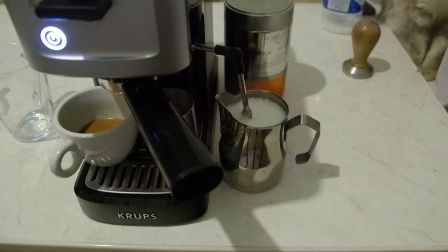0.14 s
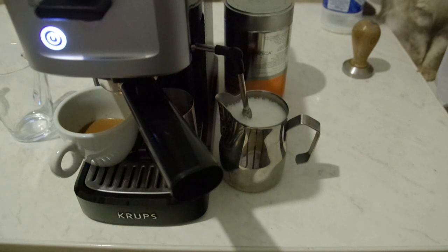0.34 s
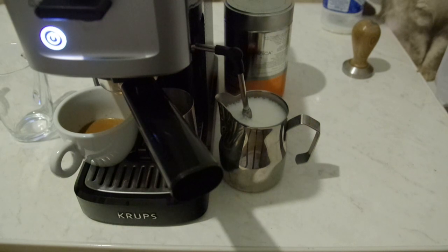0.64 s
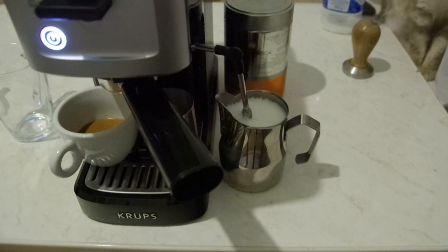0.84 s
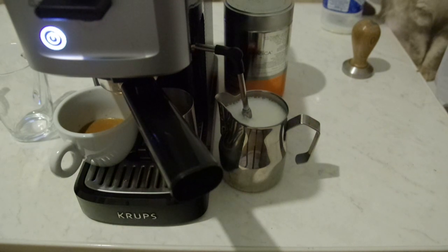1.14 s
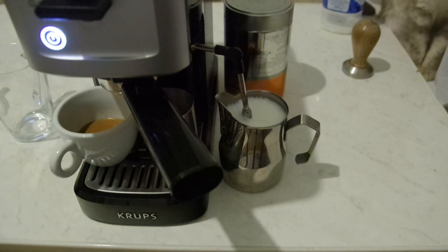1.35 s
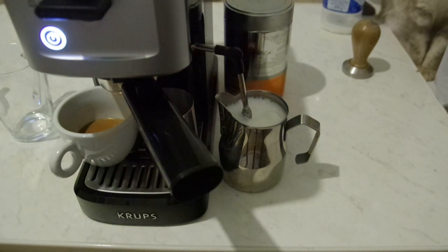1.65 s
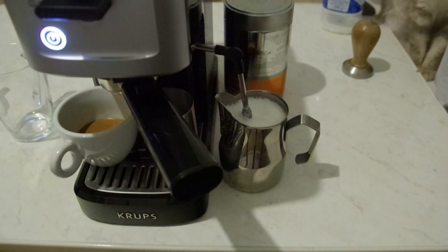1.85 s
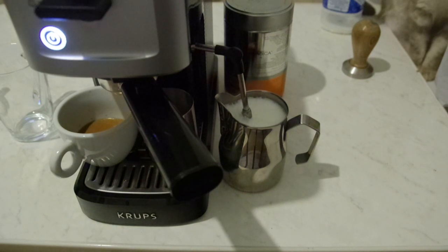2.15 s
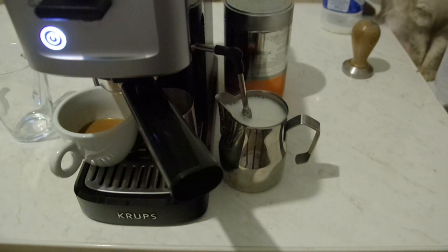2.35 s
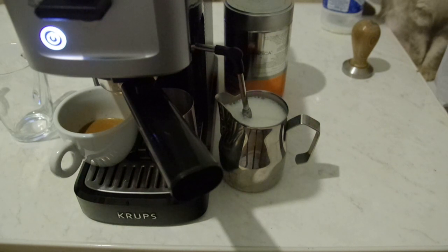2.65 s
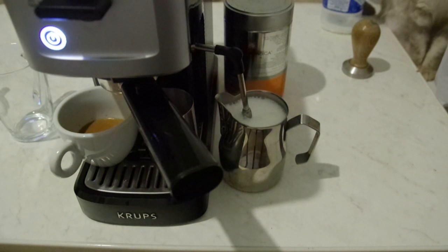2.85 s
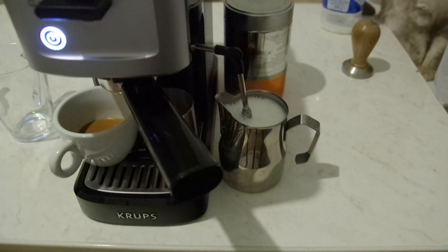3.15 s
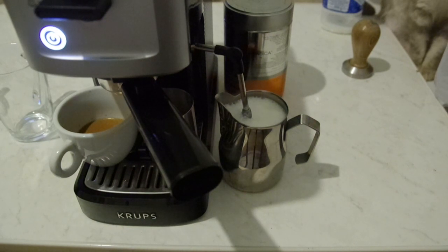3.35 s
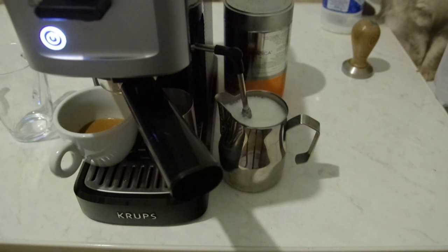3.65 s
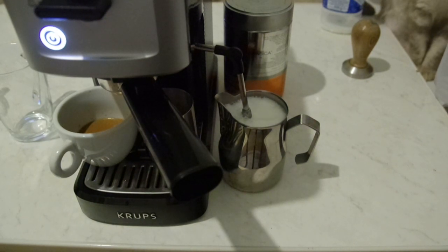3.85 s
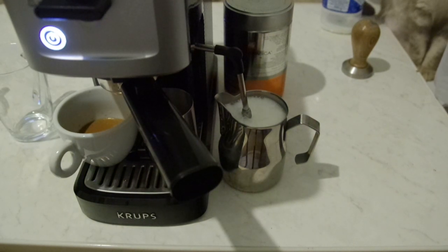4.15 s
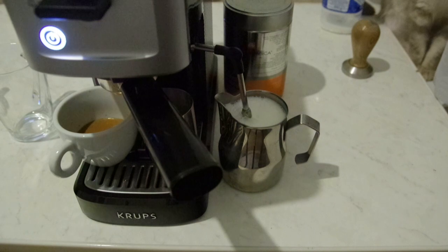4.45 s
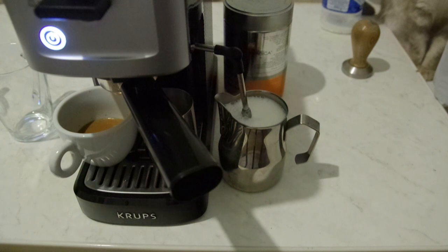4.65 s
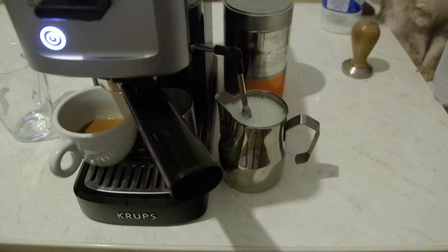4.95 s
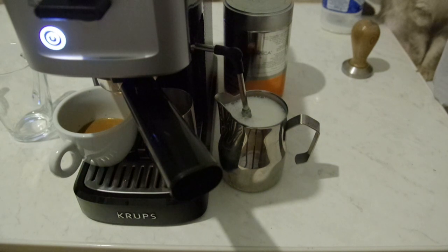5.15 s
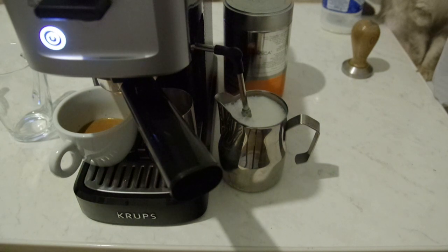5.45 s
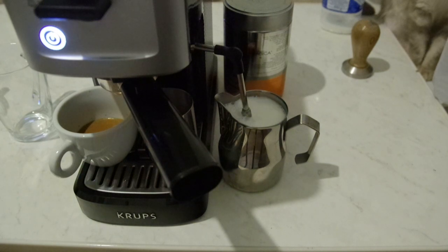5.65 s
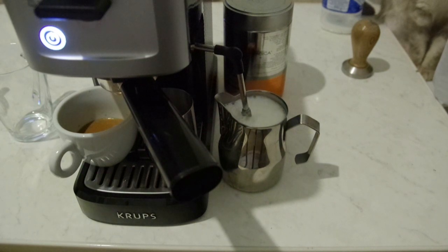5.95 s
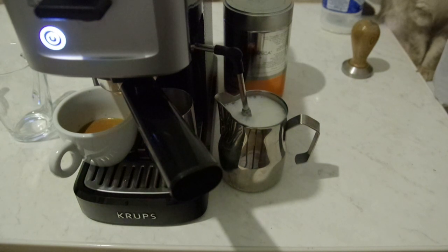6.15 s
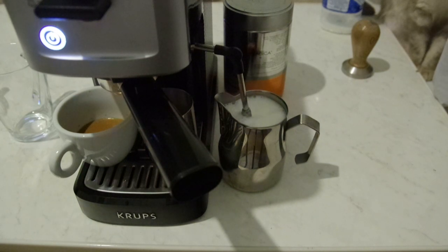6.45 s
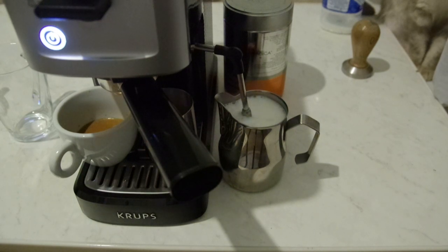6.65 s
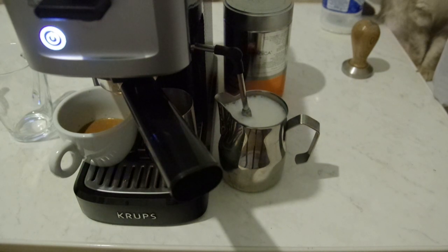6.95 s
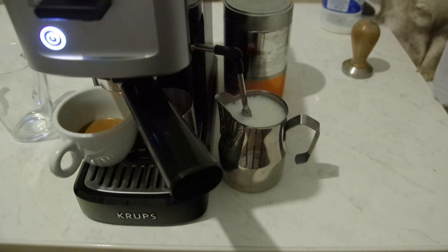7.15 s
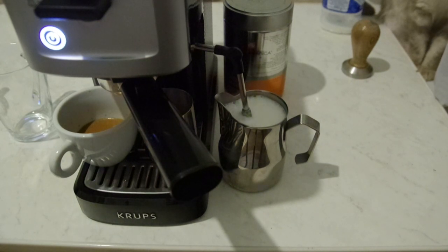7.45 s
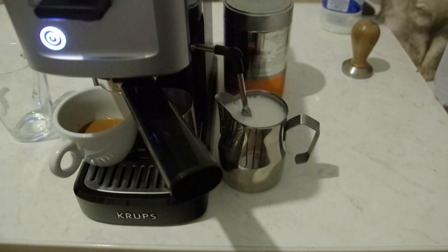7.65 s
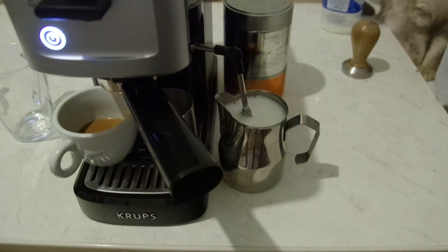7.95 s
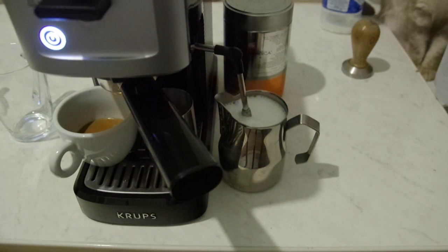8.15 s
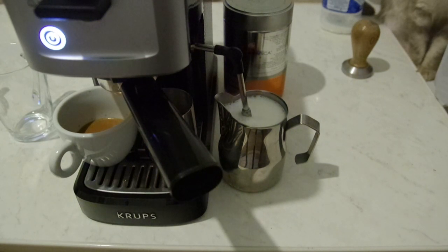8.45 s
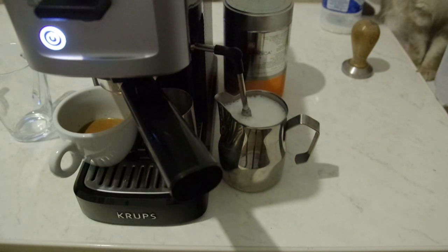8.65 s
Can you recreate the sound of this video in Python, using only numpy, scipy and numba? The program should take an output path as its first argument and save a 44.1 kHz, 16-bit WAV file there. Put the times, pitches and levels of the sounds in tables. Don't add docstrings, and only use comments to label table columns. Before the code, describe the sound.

Close milk steaming in a small kitchen: a ragged, ringing hiss slowly fades as a coffee machine's pump thuds about three times a second, skipping every fifth beat.

```python
import sys
import numpy as np
from scipy import signal
from scipy.fft import rfft, irfft, next_fast_len
from scipy.io import wavfile
from scipy.ndimage import uniform_filter1d
from numba import njit

SR = 44100
rng = np.random.default_rng(int(sys.argv[2]) if len(sys.argv) > 2 else 0)


def natural_amplitude(level_db):
    exponent = np.asarray(level_db, float) / 20
    return 10 ** exponent


def digitize_waveform(pressure):
    field = np.atleast_2d(pressure).T
    bounded = np.clip(field, -1, 1)
    quanta = np.round(bounded * 32767).astype(np.int16)
    wavfile.write(sys.argv[1], SR, quanta)


N = 387638
SIZE = next_fast_len(N)

FIRST_STROKE_S, MAINS_HZ = -0.6372, 49.997
ROUND_CYCLES, STROKE_CYCLES = 78, [0, 16, 31, 47]


def level(x, db):
    return x * natural_amplitude(db) / np.sqrt(np.mean(x ** 2))


def read(table, hz):
    points = np.array(table, float)
    return np.interp(np.log(hz), np.log(points[:, 0]), points[:, 1])


@njit
def svf(x, hz, width):
    y, b, l = np.empty(len(x)), 0., 0.
    g, k = np.tan(np.pi * hz / SR), width / hz
    for i in range(len(x)):
        v = (b + g * (x[i] - l)) / (1 + g * (g + k))
        b, l, y[i] = 2 * v - b, l + 2 * g * v, k * v
    return y


def third_octave(x, hz):
    return level(svf(svf(x, hz, hz / 3), hz, hz / 3), 0)


def walk(rate):
    k = int(SR / rate)
    held = np.repeat(rng.standard_normal(N // k + 1), k)
    return 1.27 * uniform_filter1d(uniform_filter1d(held, k), k)[:N]


def ears(direct, hz):
    # frequency in Hz, left-right likeness from 0 to 1.
    likeness = [(60, 0.6), (300, 0.78), (1400, 0.73), (3000, 0.93), (6000, 0.54), (9000, 1), (15000, 0.6)]
    # frequency in Hz, left minus right in dB.
    balance = [(60, 0.5), (200, 1.5), (700, 1.5), (1290, 0.5), (2380, -0.5), (4400, -0.9), (8120, -4.5),
               (11500, 3), (15000, -1.5)]
    like = np.clip(read(likeness, hz), 0, .99)
    side = third_octave(rng.standard_normal(N), hz)
    both = np.sqrt(1 + like) * direct + np.sqrt(1 - like) * np.array([side, -side])
    return both * natural_amplitude(read(balance, hz) / 2 * np.array([[1], [-1]])) / np.sqrt(2)


def collapses(per_s, spread_db):
    when, size = rng.random(N), rng.exponential(size=N)
    blows = (when < per_s / SR) * natural_amplitude(spread_db * np.minimum(size, 6)) * rng.standard_normal(N)
    return level(blows, 0)


def swells(t, rows):
    return sum(db * np.exp(-.5 * ((t - s) / half) ** 2) for s, db, half in rows)


def layers_db(t):
    # time in seconds, level in dB, lean to small bubbles in dB.
    boiling = [(0.0, -31, -2), (0.46, -33.5, 6), (1.03, -29, 2), (2.3, -31.5, 4.5), (2.79, -31.5, 2.5),
               (2.91, -32, 3.5), (4.09, -32.5, 2.5), (4.13, -33.5, 0), (4.6, -34, 6), (5.02, -32, 3.5),
               (5.85, -32, 3), (5.92, -32, -3), (6.02, -31.5, 3), (6.14, -35.5, 1.5), (6.31, -34, 7.5),
               (6.41, -36.5, 5), (7.91, -38.5, 6.5), (8.79, -35.5, -1.5)]
    # time in seconds, level in dB.
    tearing = [(0.0, -28.5), (0.34, -29), (0.46, -33), (0.68, -32), (0.88, -27.5), (1.15, -31), (2.01, -35),
               (3.7, -32.5), (3.94, -36), (4.48, -39), (5.21, -38), (5.8, -41.5), (6.14, -38), (6.56, -42),
               (7.22, -41.5), (7.61, -39.5), (8.2, -47), (8.79, -45.5)]
    # time in seconds, swell in dB, half length in seconds, bubble size from 0 big to 1 small.
    gulps = [(0.496, -6, 0.018, 1), (0.588, 4.5, 0.0073, 0), (0.97, 4, 0.032, 0),
             (1.707, -5.5, 0.035, 0.93), (2.074, -11, 0.015, 0.37), (2.22, 3.2, 0.014, 0),
             (2.336, -7.5, 0.031, 0.93), (2.713, 4.3, 0.035, 0.11), (2.902, -2.0, 0.06, 0),
             (2.945, -3.5, 0.027, 0.76), (3.129, -7, 0.032, 1), (3.265, 0, 0.033, 0.22),
             (3.535, -5, 0.073, 0.19), (4.08, 1, 0.018, 0), (4.23, -6, 0.014, 0.1), (4.572, -6, 0.01, 0.51),
             (5.135, 3.0, 0.027, 1), (5.923, -7, 0.024, 0), (6.018, 3.5, 0.018, 1), (6.03, 2, 0.054, 0),
             (6.132, -1.5, 0.036, 1), (6.227, -3.4, 0.018, 0), (6.308, 2.5, 0.027, 1),
             (6.562, -3.2, 0.016, 1), (7.17, 7.5, 0.025, 1), (7.943, -3, 0.04, 1), (8.432, 2.5, 0.029, 1),
             (8.549, 0.5, 0.022, 0), (8.687, -3, 0.071, 0), (8.694, -7, 0.013, 1)]
    # time in seconds, swell in dB, half length in seconds, dB of spray for each dB of swell.
    gusts = [(0.0, 1.5, 0.015, 6), (0.236, 4, 0.033, 2.5), (0.467, 8, 0.032, 1.4), (0.68, 6.5, 0.029, 0.5),
             (0.957, 1.5, 0.06, -0.5), (1.12, 1, 0.04, 5.5), (1.586, 1.5, 0.012, 8.5),
             (1.69, 4, 0.031, 2.5), (2.132, 5.5, 0.018, 1), (2.244, 4, 0.079, 1.6),
             (2.574, 3.9, 0.028, 0.5), (2.826, 0.5, 0.035, 6), (3.247, 7.5, 0.02, -1),
             (3.626, 5.1, 0.06, 0.6), (4.05, 3, 0.012, 1), (4.217, 8, 0.044, 1.16), (4.83, 4.4, 0.036, 0.3),
             (5.046, 0.4, 0.06, 6), (5.517, 1, 0.067, 6), (5.936, 2.5, 0.06, 0.5), (6.266, 5, 0.06, 0.5),
             (6.61, 8.9, 0.014, 1.2), (6.976, 2, 0.027, 2.5), (7.183, 4, 0.017, 2.1), (7.44, 7, 0.06, 0.2),
             (7.79, 5.5, 0.067, 0.6), (8.13, 3, 0.075, 2), (8.476, 3, 0.04, 2.2), (8.735, 3, 0.011, 0)]

    s, boil_db, lean_db = np.transpose(boiling)
    boil = np.interp(t, s, boil_db) - 3.5
    lean = np.interp(t, s, lean_db)
    big = boil - lean / 2 + swells(t, [(s, db * (1 - size), half) for s, db, half, size in gulps])
    small = boil + lean / 2 + swells(t, [(s, db * size, half) for s, db, half, size in gulps])

    jet = np.interp(t, *np.transpose(tearing))
    gust = swells(t, [(s, db, half) for s, db, half, bright in gusts])
    mist = swells(t, [(s, db * bright, half) for s, db, half, bright in gusts])
    spray_rise = 1.28 * (jet + 35) + mist
    spray = -45 + spray_rise
    finest = -52.5 + spray_rise + 0.9 * mist
    return np.array([big, small, jet - 1.5 + gust, spray, finest])


def steam():
    tops_hz = [2400, 4300, 8200, 12500, 15500]
    # frequency in Hz, density in dB per Hz.
    hiss = [(700, -43), (1200, -17.5), (1600, -7.5), (1930, -4.5), (2080, 2.5), (2600, 1), (2900, -1),
            (3500, 0.5), (4350, 1.5), (4600, -3), (6000, -3.5), (7600, -2), (9000, -5), (12000, -19.5),
            (13500, -23), (16000, -27)]
    s = np.arange(0, N / SR + .01, .004)
    layers = layers_db(s)
    place = np.arange(len(layers))
    tops_db = read(hiss, np.array(tops_hz)) + 10 * np.log10(tops_hz)
    surge, out = [walk(14) for _ in place], 0
    for hz in 1000 * 2 ** np.arange(0, 4.01, .25):
        where = np.interp(np.log(hz), np.log(tops_hz), place)
        mix = np.clip(1 - abs(where - place), 0, 1)
        curve_db = np.interp(np.arange(N) / SR, s, mix @ layers)
        flicker_db = 0.76 * (mix @ surge) + 1.16 * walk(40)
        drive = collapses(per_s=900, spread_db=1.5) + 0.88 * rng.standard_normal(N)
        family = third_octave(drive, hz)
        family_db = curve_db + 10 * np.log10(hz) - mix @ tops_db + flicker_db - 2.5
        out = out + ears(family, hz) * natural_amplitude(family_db)
    colour = natural_amplitude(read(hiss, np.fft.rfftfreq(SIZE, 1 / SR) + 1))
    return irfft(rfft(out, SIZE) * colour, SIZE)[:, :N]


def jug(x):
    # frequency in Hz, width in Hz, level in dB; the last row is the thin tone near 14.4 kHz.
    wall = [(2330, 30, -2), (2455, 30, -1), (2594, 30, 0), (3048, 25, 0), (3293, 20, -1), (3444, 20, 0),
            (3620, 20, -2), (3977, 20, 0), (4110, 25, -2), (4335, 25, -1), (5116, 25, 0), (5500, 25, -1),
            (7560, 40, -2), (7908, 25, -1), (8396, 25, -1), (14413, 20, 4)]
    ringing = [side + sum(natural_amplitude(db - 2.0) * svf(side, hz, width) for hz, width, db in wall) for side in x]
    return np.array(ringing) * natural_amplitude(-1.16)


def spits():
    # start in seconds, peak level in dB.
    bursts = [(0.001, -19), (0.0558, -22), (0.197, -22), (0.213, -12), (0.288, -17), (0.3606, -30),
              (0.384, -18), (0.5511, -26), (0.7891, -17), (1.2456, -22), (1.3947, -22), (1.556, -21),
              (1.5806, -17.5), (1.679, -13.5), (2.1081, -27), (2.1306, -15.5), (2.2358, -18), (2.3105, -18),
              (2.5691, -22), (3.1103, -19.5), (3.2526, -15.5), (3.65, -15), (4.0442, -23), (4.186, -21),
              (4.207, -18), (4.816, -23), (5.5473, -24), (6.616, -21.5), (8.111, -29), (8.7311, -27.5)]
    t, out = np.arange(int(.12 * SR)) / SR, np.zeros((2, N + SR))
    fade = np.exp(-t / 0.0068) + 0.067 * np.exp(-t / 0.025)
    shape = (1 - np.exp(-t / 0.0024)) * fade
    edge = signal.butter(N=3, Wn=6760, btype="high", fs=SR, output="sos")
    for s, db in bursts:
        crackle = rng.standard_normal(len(t)) * natural_amplitude(1.8 * rng.exponential(size=len(t)))
        burst = level(crackle, 0) + 0.74 * rng.standard_normal((2, len(t)))
        dull = np.array([svf(side, 7400.0, 6500.0) for side in burst * shape])
        start = int(s * SR)
        out[:, start:start + len(t)] += signal.sosfilt(edge, dull) * natural_amplitude(db + 4.5)
    return out[:, :N]


def nearby(x):
    t = np.arange(int(.03 * SR)) / SR
    echoes = rng.standard_normal((2, len(t))) * (rng.random((2, len(t))) < .02) * np.exp(-t / .012)
    echoes /= np.sqrt((echoes ** 2).sum(axis=1, keepdims=True))
    return x + natural_amplitude(-8) * np.array([signal.fftconvolve(side, echo)[:N] for side, echo in zip(x, echoes)])


def strokes():
    strengths = [-0.63, -0.4, -0.36, 0.03]
    rows = []
    for k in range(int(N / SR * MAINS_HZ / ROUND_CYCLES) + 2):
        for cycle, db in zip(STROKE_CYCLES, strengths):
            rows.append((FIRST_STROKE_S + (k * ROUND_CYCLES + cycle) / MAINS_HZ, db))
    return rows


def piston_blows():
    # seconds after the stroke starts, level in dB, direction, contact time in ms.
    run = [
        (-0.00011, -16.0, -1, 0.03),
        (0.00387, -16.7, -1, 0.03),
        (0.00747, -0.0, 1, 0.3),
        (0.01453, -12.1, -1, 0.03),
        (0.01891, -12.5, 1, 0.31),
        (0.02089, -14.1, -1, 0.03),
        (0.02943, -5.8, 1, 0.39),
    ]
    blows, around = np.zeros(N + 4 * SR), np.arange(-64, 65)
    rows = strokes()
    for (s, db), scatter in zip(rows, rng.standard_normal((len(rows), len(run)))):
        for (lag, blow_db, way, contact_ms), chance in zip(run, scatter):
            push = np.exp(-.5 * (around / (contact_ms * SR / 1000)) ** 2)
            strength = natural_amplitude(db + blow_db + 1.0 * chance)
            blows[int((1 + s + lag) * SR) + around] += way * strength * push / push.sum()
    return blows


def casing(t):
    # frequency in Hz, 60 dB decay in seconds, level in dB, panel moving out 1 or in -1.
    panels = [(74, 0.6, -19.4, -1), (179, 0.23, -22.7, -1), (211, 0.6, -26.1, -1), (258, 0.12, 6.9, 1),
              (284, 0.06, 10.9, -1), (298, 0.6, -2.4, 1), (330, 0.28, -15.6, -1), (361, 0.38, -15.5, -1),
              (398, 0.06, -4.3, -1), (453, 0.13, 2.7, -1), (473, 0.6, -21.7, -1), (527, 0.13, 12.0, -1),
              (548, 0.47, -8.4, -1), (581, 0.44, 2.0, 1), (606, 0.25, 10.1, 1), (629, 0.24, -1.5, -1),
              (664, 0.19, -0.0, 1), (689, 0.33, -14.4, 1), (710, 0.24, 2.3, 1), (728, 0.28, -2.8, 1),
              (778, 0.08, 0.6, 1), (829, 0.24, -1.8, -1), (896, 0.35, -5.0, -1), (946, 0.6, -23.3, -1),
              (1023, 0.2, -7.2, -1), (1102, 0.13, -14.2, -1), (1252, 0.11, -10.3, -1),
              (1366, 0.32, -16.5, -1), (1478, 0.09, -8.5, -1)]
    ring = 0
    for hz, t60, db, way in panels:
        decay = np.exp(-np.log(1000) * t / (1.04 * t60))
        ring = ring + way * natural_amplitude(db - 30.0) * decay * np.sin(2 * np.pi * hz * t)
    ring -= np.exp(-t / .012) * uniform_filter1d(ring, size=400)
    kitchen_t60_s = 0.34
    echo = rng.standard_normal((2, len(t))) * np.exp(-np.log(1000) * t / kitchen_t60_s) * np.clip(t / .05, 0, 1)
    echo /= np.sqrt((echo ** 2).sum(axis=1, keepdims=True))
    wet = signal.fftconvolve(echo, ring[None])[:, :len(t)]
    return ring * natural_amplitude(np.array([[1.6], [-1.6]])) + natural_amplitude(-11.5) * wet


def rattle(blows, t):
    # frequency in Hz, width in Hz, level in dB.
    loose_parts = [(808, 340, -4), (1190, 1000, -17.5), (522, 156, 2), (367, 158, 2.5), (185.6, 10, -4)]
    shake = rng.standard_normal(len(blows)) * signal.fftconvolve(abs(blows), np.exp(-t / 0.027))[:len(blows)]
    return sum(natural_amplitude(db - 17.5) * svf(svf(shake, hz, 2 * width), hz, width) for hz, width, db in loose_parts)


def valve_tick(blows, t):
    fade = natural_amplitude(-30.5) * np.exp(-t / 0.0035)
    return np.gradient(rng.standard_normal(len(blows))) * signal.fftconvolve(abs(blows), fade)[:len(blows)]


def rested_housing(knocks):
    cycles = ((np.arange(knocks.shape[1]) / SR - 1 - FIRST_STROKE_S) * MAINS_HZ + 1) % ROUND_CYCLES
    slack = cycles < STROKE_CYCLES[1]
    return natural_amplitude(-8.5) * np.array([svf(side * slack, 746., 48.) for side in knocks])


def pump():
    t = np.arange(SR // 2) / SR
    heard = casing(t)
    blows = piston_blows()
    knocks = signal.fftconvolve(blows[None], heard)[:, :len(blows)]
    machine = knocks + rested_housing(knocks) + rattle(blows, t) + valve_tick(blows, t)
    return machine[:, SR:SR + N]


def rumble():
    # frequency in Hz, density in dB per Hz.
    tone = [(20, 1), (40, -10), (72, -9.5), (110, -11.5), (175, -11), (215, -13), (270, -5), (320, -13),
            (450, -11), (650, -8), (1000, -15.5), (1500, -8)]
    churn_fade_db_per_s = -0.26
    out = 0
    for hz in 22 * 2 ** np.arange(0, 6.2, 1 / 3):
        band = third_octave(rng.standard_normal(N), hz)
        calm_db = (hz > 130) * churn_fade_db_per_s * (np.arange(N) - N / 2) / SR
        out = out + ears(band, hz) * natural_amplitude(read(tone, hz) + 10 * np.log10(hz) + 3.3 * walk(7.2) + calm_db)
    return level(out, -47.5)


def scene():
    both = rfft(nearby(jug(steam()) + spits()) + pump() + rumble(), SIZE)
    left_delay_s = 1.45e-5
    both[0] *= np.exp(-2j * np.pi * np.fft.rfftfreq(SIZE, 1 / SR) * left_delay_s)
    return irfft(both, SIZE)[:, :N]


def band_limit(x):
    return signal.sosfilt(signal.butter(12, 16000, fs=SR, output="sos"), x)


def record(dry):
    noisy = dry + natural_amplitude(-52) * rng.standard_normal(dry.shape)
    top_cut = signal.ellip(12, .2, 55, 15740, fs=SR, output="sos")
    return band_limit(signal.sosfilt(top_cut, noisy))


dry = scene()
out = record(dry)
digitize_waveform(out)
```